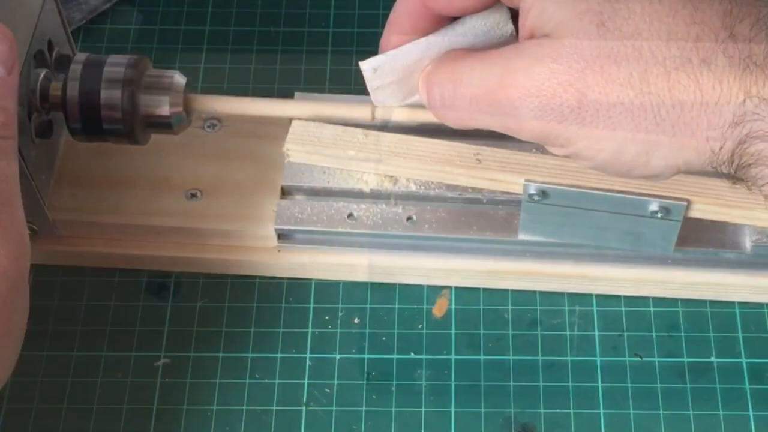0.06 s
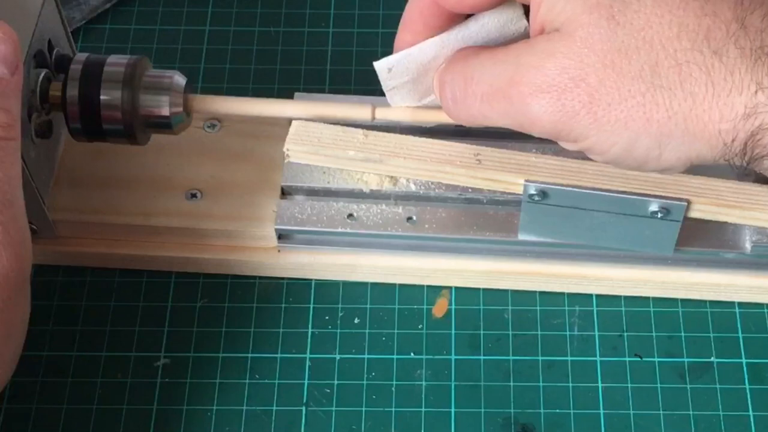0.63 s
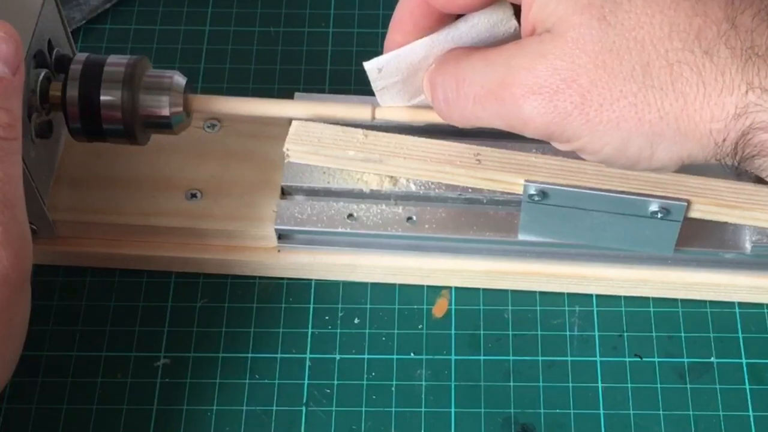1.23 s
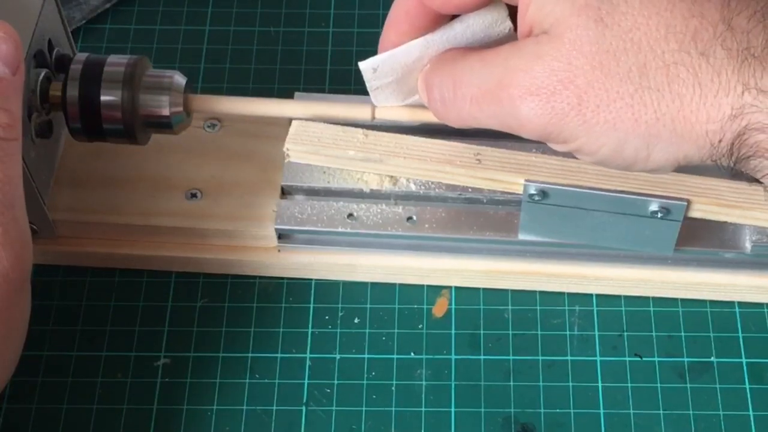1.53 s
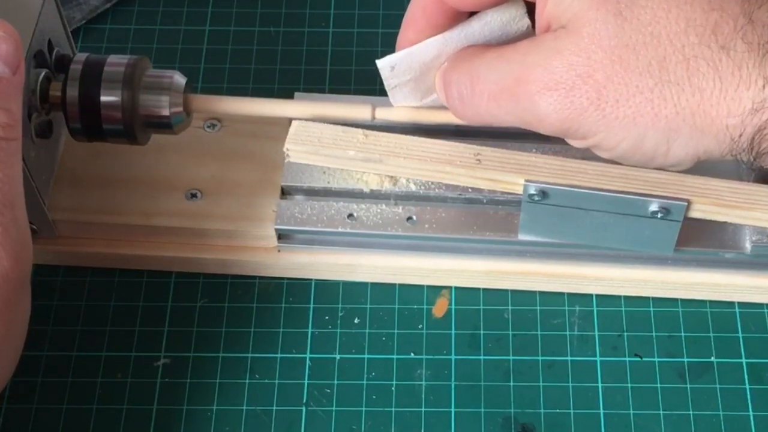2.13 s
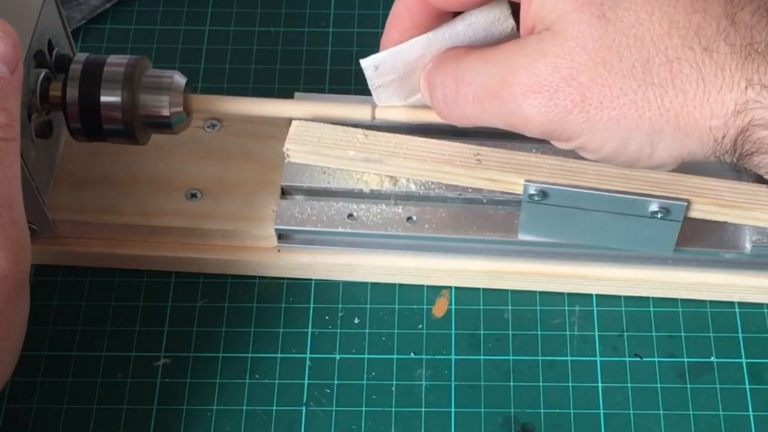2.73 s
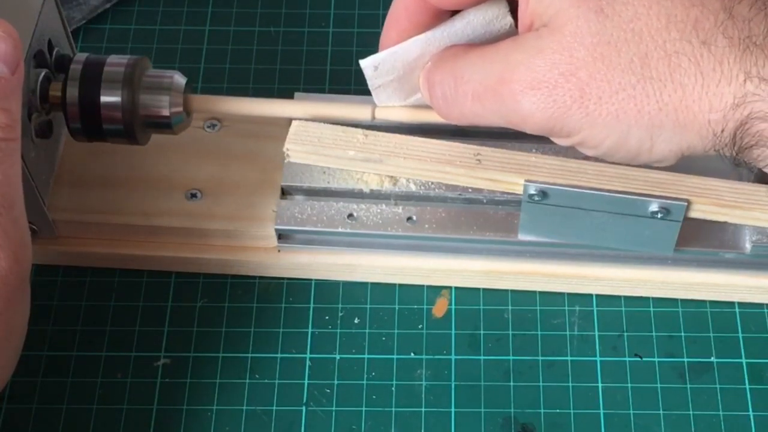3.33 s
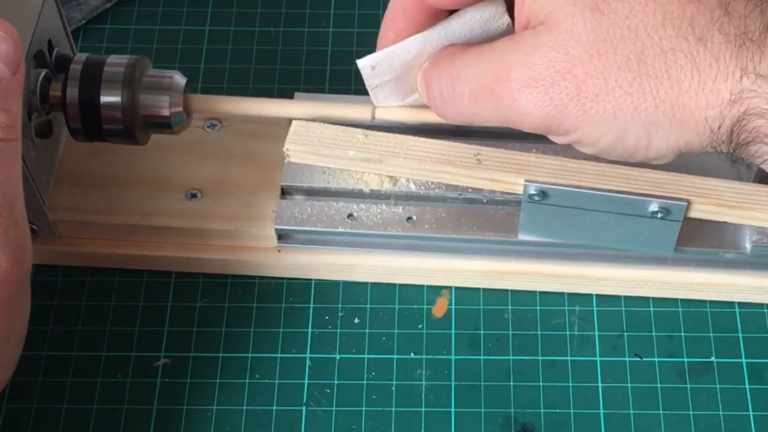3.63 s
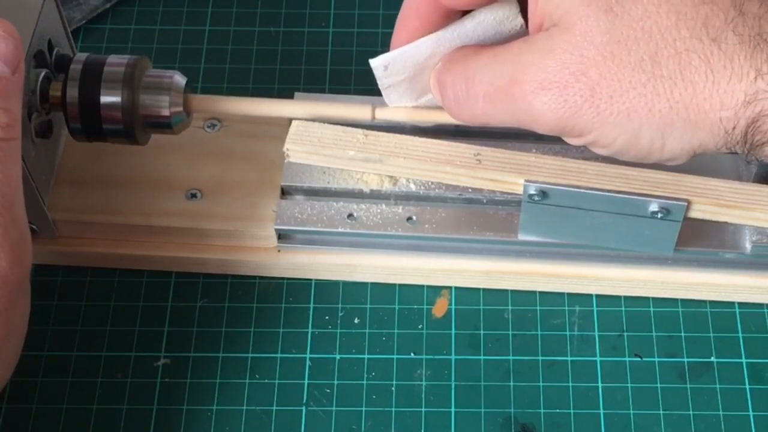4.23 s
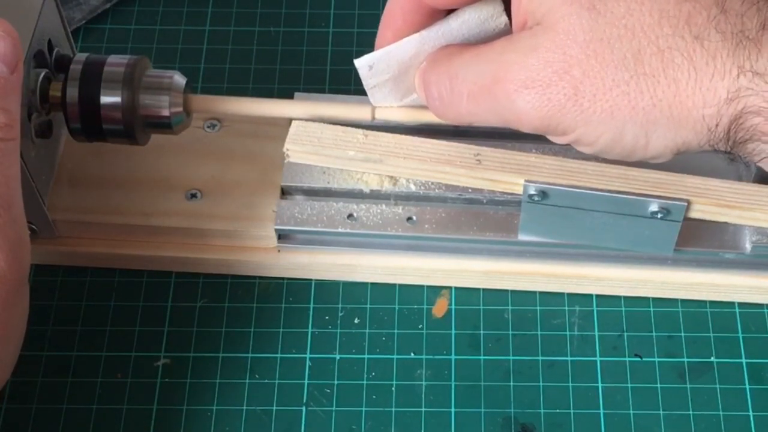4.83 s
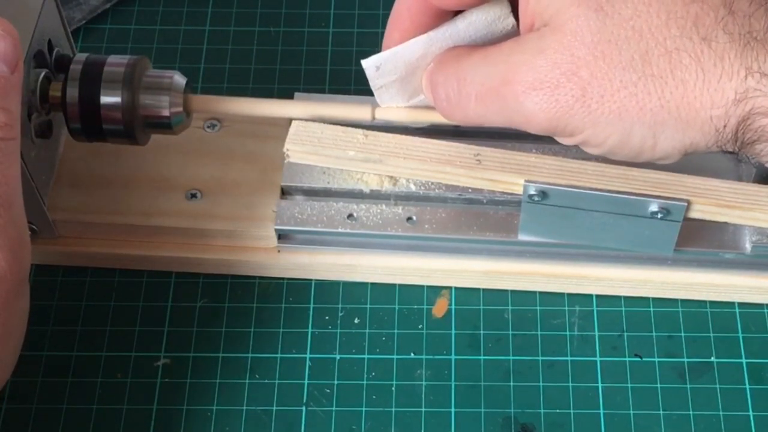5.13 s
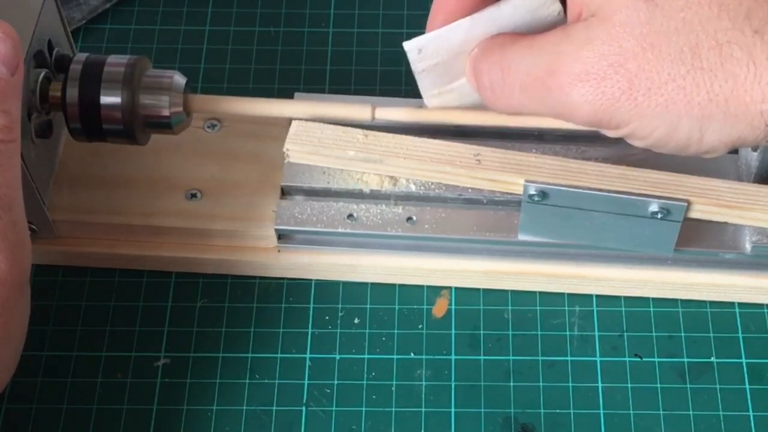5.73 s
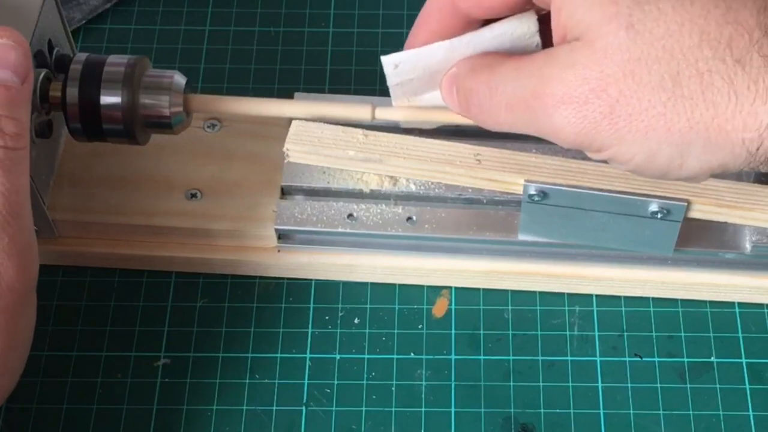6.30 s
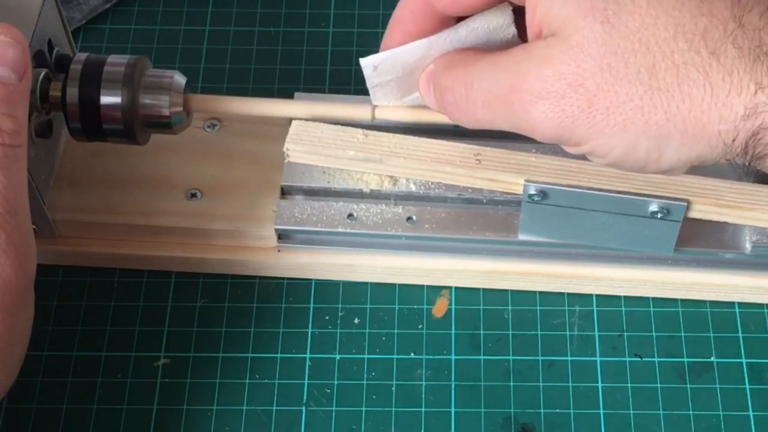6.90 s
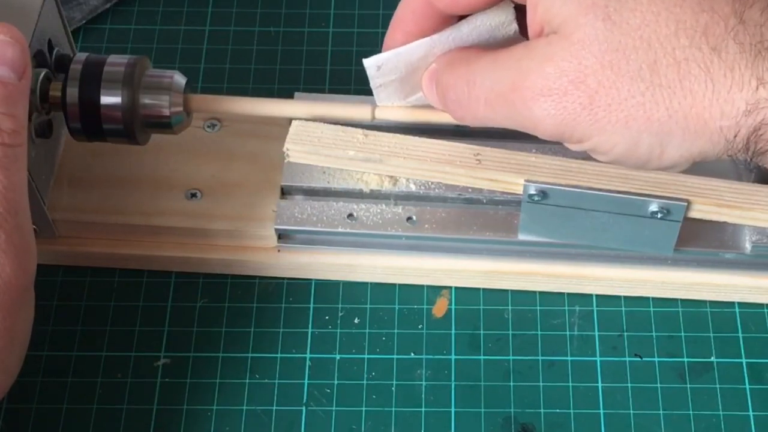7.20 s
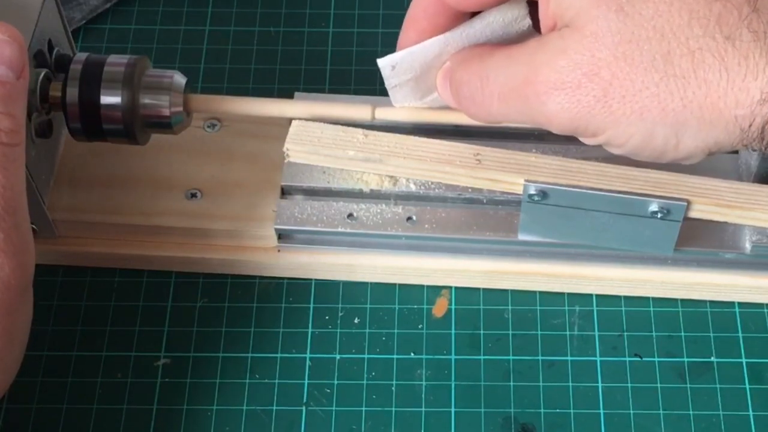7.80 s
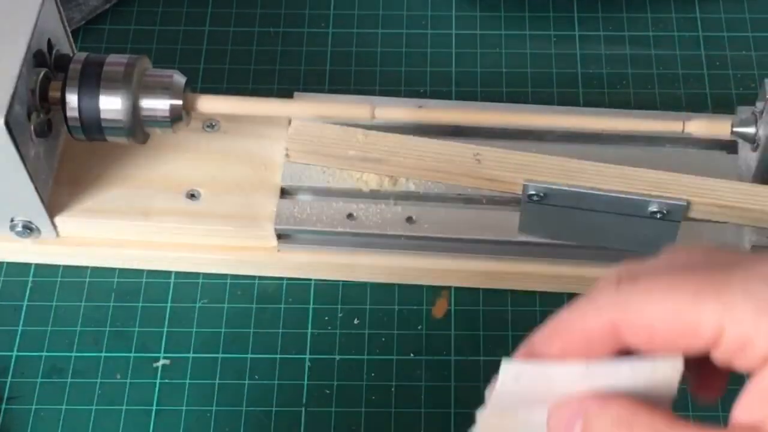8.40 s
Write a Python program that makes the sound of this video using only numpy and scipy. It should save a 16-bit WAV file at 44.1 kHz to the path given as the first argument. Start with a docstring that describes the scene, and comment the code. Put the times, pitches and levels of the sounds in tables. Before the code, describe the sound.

The hum of a small motor and the grainy hiss of sandpaper on a turning wooden rod fade in, close up in a workshop with little echo. A slack chuck chatters and knocks irregularly over a low bearing rumble and a thin whine. Later the paper comes off briefly and the motor runs a little faster with a rough whir. Sanding resumes, then the paper lifts again just before the end.

```python
"""A motor's hum and a dry rasp fade in: sandpaper held against a wooden dowel that spins in a drill chuck
at about 112 turns a second. The shaft hums, the ball bearings rumble and hiss, and the slack chuck
rattles and knocks into the metal frame in short bouts. Twice the paper is lifted: the motor speeds up
a little, the bare rod whirs and the overtones shift."""
import sys
import numpy as np
from scipy import signal
from scipy.fft import rfft, irfft, next_fast_len
from scipy.io import wavfile

SR = 44100
rng = np.random.default_rng(int(sys.argv[2]) if len(sys.argv) > 2 else 0)


def int16_out(signal):
    """Quantize to a 16-bit WAV file."""
    q = np.round(np.clip(np.atleast_2d(signal).T, -1, 1) * 32767)
    wavfile.write(sys.argv[1], SR, q.astype(np.int16))


N = 377055

# workshop room tone: (frequency [Hz], relative level [dB])
ROOM_SPECTRUM = [(15, 9.5), (40, 0), (90, 5.5), (170, -6.5), (500, -0.5), (1500, -8), (7000, -27.5)]
# reflections off the bench and nearby things: (delay [s], gain [factor])
BENCH_ECHOES = [(.00129, 0.062), (.00427, 0.054), (.00455, 0.046), (.00907, .08), (0.013, 0.069)]
# dips in what the frame radiates: (frequency [Hz], width [Hz], depth [0-1])
FRAME_DIPS = [(283, 55, 0.6), (595, 27, 0.6), (626, 48, 0.82), (762, 20, .55), (818, 36, 0.3),
              (917, 22, 0.4), (1060, 50, 0.3), (1330, 70, 0.4), (2090, 90, 0.2), (2780, 24, 0.2),
              (5916, 110, 0.9), (6000, 70, 0.6)]
# wandering hollows in the treble: (frequency [Hz], width [Hz], wander [Hz], depth [0-1])
TREBLE_HOLLOWS = [(3458, 117, 38, 0.95), (4150, 70, 50, 0.7)]
# the paper comes off the rod: (time [s], length [s])
PAPER_LIFTS = [(5.799, 0.58), (8.069, 0.6)]
# whir of the undamped rod: (frequency [Hz], relative level [dB])
WHIR_SPECTRUM = [(150, -23), (400, -11), (600, 4), (950, 1.5), (1400, -3), (2000, 4.5), (2600, -12.5),
                 (4000, -30.5)]
# modes of the wooden bed: (frequency [Hz], width [Hz], relative level [dB])
BED_MODES = [(118.3, 21, -3), (215.9, 27.3, -1), (346.5, 40, 1), (434, 38, -7.5), (676.4, 21.8, -3),
             (783.7, 45, -9.5), (882.5, 32, -13), (995, 30, -12), (1219, 26, -12.5), (1353, 22, -9.5)]
# the bed shudders and the rumble thickens or thins: (middle [s], length [s], gain [dB])
BED_SHUDDERS = [(1.1, 0.8, 0.5), (5.705, 0.55, 3), (6.5, 0.8, 3), (6.73, 0.12, 3.5), (7.7, 1.2, -1.5)]
# hiss of bearings and paper: (frequency [Hz], relative level [dB])
HISS_SPECTRUM = [(300, -9), (800, -3), (1300, -1.5), (2000, 1.5), (3000, -4.5), (3650, -0.5), (3755, 9),
                 (3880, -1.5), (4080, 1.5), (4350, 1.5), (5650, 0.5), (5950, 0.5), (6350, -3), (6750, -8.5),
                 (7100, -35)]
# the paper bites harder or lighter: (middle [s], length [s], hiss gain [dB])
PAPER_BITES = [(1.2, 2.6, -0.7), (3.45, 1.1, 0.4), (6.3, 1.3, -0.9), (7.3, 0.7, 0.8)]
# modes of chuck and frame: (frequency [Hz], width [Hz], relative level [dB])
METAL_MODES = [(1594, 150, -10), (1666, 107, -6.5), (1746, 40, -6.5), (1954, 44, -8), (2297, 78, -2.5),
               (2442, 70, -1.5), (2520, 50, 2), (2637, 110, -2.5), (2817, 134, 0.5), (2942, 132, 2.5),
               (3089, 150, -2.5), (3200, 74, -2), (3410, 110, -6)]
# bouts of rattling in the slack chuck: (middle [s], length [s], gain [dB])
RATTLE_BOUTS = [(0.287, 0.61, 4), (0.7, 0.24, 3.5), (0.812, 0.14, 6.5), (0.927, 0.18, 4), (1.175, 0.22, 4),
                (1.568, 0.26, 6), (1.853, 0.15, 3), (2.03, 0.49, 5), (2.46, 0.15, 2.5), (2.585, 0.2, 4.5),
                (2.933, 0.45, 3.5), (3.48, 0.12, 2), (3.704, 0.24, 3.5), (3.976, 0.14, 3.5),
                (4.222, 0.46, 2.5), (4.484, 0.18, 6.5), (4.71, 0.3, 4.5), (5.059, 0.72, 5),
                (5.502, 0.11, 4), (5.587, 0.14, 6.5), (6.147, 0.59, 3.5), (6.417, 0.076, 7.5),
                (6.65, 0.16, 2.5), (7.385, 0.85, 4), (7.773, 0.12, 0), (7.93, 0.41, 6), (8.177, 0.24, 3),
                (8.43, 0.15, 1.5)]
# harder knocks that stand out of the rattle: (time [s], relative level [dB])
CHUCK_KNOCKS = [(0.671, -25), (0.806, -19), (1.233, -24), (1.744, -21), (1.974, -21), (2.388, -18),
                (2.555, -20), (2.627, -16), (2.765, -18), (3.072, -19.5), (3.4123, -14), (3.481, -23),
                (3.703, -22), (3.7624, -20), (4.2051, -21), (4.478, -25), (4.687, -12.5), (4.7218, -17.5),
                (4.776, -18), (5.08, -18), (5.29, -18), (5.334, -25), (5.596, -14.5), (5.8996, -21),
                (6.0146, -15.5), (6.166, -22), (6.225, -17.5), (6.65, -21), (6.7682, -19.5), (6.887, -24),
                (7.069, -19), (7.115, -20), (7.1863, -16), (7.3752, -19), (7.465, -15), (7.52, -14.5),
                (7.5903, -19), (7.7492, -18), (7.8557, -15), (7.928, -16)]
# growl and whine of the bearings: (pitch [x shaft speed], relative level [dB], gain when free [dB])
BALL_TONES = [(1.925, -51, -3), (3.075, -45.3, -2.2), (4.075, -60, 1), (6.075, -58, 0), (21.7, -55, 1),
              (22.7, -57, 0), (23.6, -55, -2), (25.6, -55, -1), (28.54, -52, -5)]
# spells in which the whirling rod runs true: (middle [s], length [s], fall [units of whirl])
TRUE_RUNS = [(0.9, 1.3, 0.98), (2.392, 0.95, 1.73), (4.155, 0.82, 1.65), (5.56, 0.73, 1.4)]
# single overtones swell or sink: (pitch [x shaft speed], middle [s], length [s], gain [dB])
HARMONIC_SWELLS = [(6, 0.33, 1.2, -6), (6, 7.83, 0.63, 4.5), (7, 0.63, 0.5, 5), (7, 2.11, 0.4, 5.5),
                   (7, 7.2, 1.2, 5.5), (10, 0.55, 0.87, 6), (10, 5, 1.2, 9), (10, 7.0, 0.83, -7),
                   (6, 8.4, 0.6, 1), (11, 8.4, 0.5, 2), (11, 5.9, 0.5, -7), (11, 0.39, 0.97, -4),
                   (10, 2.62, 0.7, -6), (10, 4.45, 0.3, -4), (6, 2.7, 0.63, 3)]
# shaft hum: (pitch [x shaft speed], level [dB], gain when free [dB], gain per unit of whirl [dB])
SHAFT_HARMONICS = [(1, -27.5, 0.7, 0.13), (2, -45, 1, 10), (4, -65.5, 7.5, -4), (5, -48, 0, -0.3),
                   (6, -48, 5.5, -3.5), (7, -53, -1, 0), (10, -51.5, -8.5, 1), (11, -53, 1.5, -2),
                   (12, -70, 13.5, 2.5), (13, -59.5, 0, -4.5), (14, -67.5, 0, 1.5), (15, -53, 2, 0),
                   (17, -63.5, -4, 1), (20, -52, 3, -2.5), (21, -59, -1, -3.5)]
# opening fade: (time [s], gain [factor])
FADE_CURVE = [(0, 0.28), (0.3, 0.57), (0.68, 0.96)]

BALLS, BALL_PASSES_PER_TURN = 8, 3.075


def from_db(db):
    """Decibels to gain."""
    return 10 ** (np.asarray(db) / 20)


def rms_one(x):
    """Scale to an rms of one."""
    return x / np.sqrt(np.mean(x ** 2) + 1e-20)


def delayed(x, delay_s):
    """The same sound, later."""
    return np.interp(np.arange(N) - delay_s * SR, np.arange(N), x, left=0)


def swells(rows):
    """A curve of smooth bumps, one for each (middle [s], length [s], height)."""
    t = np.arange(N) / SR
    return sum(height * np.cos(np.pi * np.clip((t - middle_s) / length_s, -.5, .5)) ** 2
               for middle_s, length_s, height in rows)


def drift(rate_hz):
    """Smooth random motion with a spread of one."""
    step, run_in = 40, 2000
    pole = np.exp(-2 * np.pi * rate_hz * step / SR)
    noise = rng.standard_normal(N // step + run_in + 2)
    slow = signal.lfilter([1], [1, -2 * pole, pole * pole], noise)[run_in:]
    return np.interp(np.arange(N) / step, np.arange(len(slow)), rms_one(slow))


def pulse(turns, per_turn=1):
    """A cosine locked to the shaft's turning."""
    return np.cos(2 * np.pi * per_turn * turns)


def coloured(x, spectrum):
    """Give a noise its spectrum; rms one."""
    hz, level_db = np.transpose(spectrum)
    size = next_fast_len(N)
    bins_hz = np.maximum(np.fft.rfftfreq(size, 1 / SR), 1)
    gain = from_db(np.interp(np.log(bins_hz), np.log(hz), level_db))
    return rms_one(irfft(rfft(x, size) * gain, size)[:N])


def resonate(x, hz, width_hz):
    """One resonance, gain one at its top."""
    r = np.exp(-np.pi * width_hz / SR)
    feedback = [1, -(1 + r * r) * np.cos(2 * np.pi * hz / SR), r * r]
    return signal.lfilter(np.array([1, 0, -1]) * (1 - r * r) / 2, feedback, x + 1e-18)


def tone(turns, multiple):
    """A tone locked to the shaft, rms one; small wobbles unsettle the high tones most."""
    waver, flutter = min(.025 * (multiple - .6), .4), min(.009 * multiple, .35)
    surge, slip = [waver * drift(rate_hz=8.3) + flutter * drift(rate_hz=9.3) for _ in range(2)]
    phase = 2 * np.pi * multiple * turns
    return rms_one(slip * np.sin(phase) - (1 + surge) * np.cos(phase))


def room_tone(level_db=-52):
    """The workshop's steady, dark background."""
    return from_db(level_db) * coloured(rng.standard_normal(N), ROOM_SPECTRUM)


def bench_echoes(x):
    """Faint early reflections off the bench and nearby things."""
    return sum(gain * delayed(x, delay_s) for delay_s, gain in BENCH_ECHOES)


def frame_dips(x):
    """The frame radiates poorly in a few narrow bands."""
    for hz, width_hz, depth in FRAME_DIPS:
        x = x - depth * resonate(x, hz, width_hz)
    return x


def treble_hollows(x):
    """Narrow notches wander to and fro in the treble."""
    for hz, width_hz, wander_hz, depth in TREBLE_HOLLOWS:
        centre_hz = hz + wander_hz * drift(rate_hz=3.2)
        carrier = np.exp(2j * np.pi * np.cumsum(centre_hz) / SR)
        lowpass = signal.butter(2, width_hz / 2, fs=SR, output="sos")
        band = signal.sosfiltfilt(lowpass, x / carrier, padtype=None)
        x = x - depth * 2 * (band * carrier).real
    return x


def free_running(spin_up_s=0.0945, settle_s=0.243):
    """0 under the paper, 1 running free: the motor spins up quickly and settles back slowly."""
    t = np.arange(N) / SR
    free = np.zeros(N)
    for lift_s, length_s in PAPER_LIFTS:
        rise = 1 - np.exp(-np.maximum(t - lift_s, 0) / spin_up_s)
        free += rise * np.exp(-np.maximum(t - lift_s - length_s, 0) / settle_s)
    return free


def shaft_speed(free, loaded_hz=112.12, free_hz=112.95, wander_hz=.1):
    """Turns per second: faster when free, sagging under a last press of the paper before each lift."""
    lead_s, press_s, sag_hz = 0.027, 0.2406, 0.664
    sag = swells((lift_s - lead_s, press_s, sag_hz) for lift_s, _ in PAPER_LIFTS)
    return loaded_hz + (free_hz - loaded_hz) * free - sag + wander_hz * drift(rate_hz=2.037)


def whine(turns, free, level_db=-51, free_db=2.5, flicker_db=1.5):
    """A thin, flickering high whine, stronger with the paper off."""
    flickering = tone(turns, multiple=33.49) * from_db(flicker_db * drift(rate_hz=5.6))
    return from_db(level_db + free_db * free) * rms_one(flickering)


def rod_whir(turns, free, level_db=-44.5, push_db=3):
    """With the paper off, the bare rod adds a rough whir, pulsing once a turn."""
    noise = rng.standard_normal(N) * from_db(push_db * pulse(turns))
    return from_db(level_db) * free * coloured(noise, WHIR_SPECTRUM)


def rumble_level(free, loaded_db=-42.5, free_db=2.5):
    """In dB: the paper damps the bearings, so they rumble more when it is off; the bed also shudders."""
    return loaded_db + free_db * free + swells(BED_SHUDDERS) + 0.15 * drift(rate_hz=3.8)


def bearing_rumble(turns, level_db, push_db=3):
    """Balls rolling on uneven races shake the wooden bed, hardest at each turn's push."""
    force = rng.standard_normal(N) * from_db(push_db * pulse(turns))
    bed = sum(from_db(db) * resonate(resonate(force, hz, width), hz, width)
              for hz, width, db in BED_MODES)
    return from_db(level_db) * rms_one(bed)


def come_round(x, turns, repeat=0.24, wear=0.89):
    """Rough spots come round for six more turns, fainter as they wear: a trace of pitch in the rasp."""
    turn_s = 1 / (np.gradient(turns) * SR)
    return x + repeat * sum(wear ** k * delayed(x, (k + 1) * turn_s) for k in range(6))


def friction_hiss(turns, rattle_db, level_db=-37.5, grain_db=1.35):
    """Grainy hiss of the bearings and of grit on wood; it swells with the rattle and the paper's bite."""
    grit = come_round(rng.standard_normal(N), turns)
    texture = from_db(grain_db * drift(rate_hz=300) + 0.16 * pulse(turns))
    swell_db = swells(PAPER_BITES) + 0.3 * (rattle_db - rattle_db.mean())
    return from_db(level_db + swell_db) * coloured(grit * texture, HISS_SPECTRUM)


def metal_ring(x, contact_hz=3900):
    """The modes of chuck and frame, summed with alternating signs; blunt contacts carry little treble."""
    force = signal.sosfilt(signal.butter(4, contact_hz, fs=SR, output="sos"), x + 1e-18)
    return sum((-1) ** k * from_db(db) * resonate(force, hz, width)
               for k, (hz, width, db) in enumerate(METAL_MODES))


def rattle_level(resting_db=-37, unrest_db=0.5):
    """In dB: a quiet, restless rattle that swells in each bout."""
    return resting_db + swells(RATTLE_BOUTS) + unrest_db * drift(rate_hz=9.1)


def chuck_rattle(turns, level_db, impacts_per_s=5000, spread_db=3):
    """Dense little impacts, in clumps and hardest where the contact force peaks, ring the metal."""
    impacts = (rng.random(N) < impacts_per_s / SR) * rng.choice([-1, 1], N)
    sizes = from_db(spread_db * rng.standard_normal(N))
    # the contact force peaks twice a turn and each time a ball rolls by
    contact_db = 3 * pulse(turns, 2) + 3 * pulse(turns, BALL_PASSES_PER_TURN)
    # the ball cage and the crooked rod each lean on the bearing once per turn of their own
    lean_db = 0.5 * pulse(turns, BALL_PASSES_PER_TURN / BALLS) + 0.8 * pulse(turns)
    clump_db = 1.4 * drift(rate_hz=55)
    force = come_round(impacts * sizes, turns) * from_db(contact_db + lean_db + clump_db)
    return from_db(level_db) * rms_one(metal_ring(force))


def chuck_knocks(chatter_s=0.018, lag_s=0.002, gain_db=-5):
    """The chuck takes up its slack with a knock, inside a short burst of chatter."""
    clicks = np.zeros(N)
    for time_s, db in CHUCK_KNOCKS:
        clicks[round(time_s * SR)] += from_db(db)
    bursts = signal.fftconvolve(clicks, np.hanning(round(chatter_s * SR)), "same")
    chatter = delayed(bursts, lag_s) * rng.standard_normal(N)
    unit_peak = np.abs(metal_ring(signal.unit_impulse(SR // 10))).max()
    return from_db(gain_db) * metal_ring(0.85 * clicks + 0.071 * chatter) / unit_peak


def bearing_growl(turns, free, rumble_db):
    """The rolling balls add tones off the shaft's harmonics that swell with the rumble."""
    balls = sum(from_db(db + free_db * free) * tone(turns, multiple)
                for multiple, db, free_db in BALL_TONES)
    return balls * from_db(0.9 + 0.5 * (rumble_db - rumble_db.mean()))


def shaft_hum(turns, free, usual_whirl=0.27):
    """One push a turn makes harmonics; their balance shifts with the load and the rod's off-axis whirl."""
    whirl = usual_whirl - swells(TRUE_RUNS)
    hum = np.zeros(N)
    for multiple, db, free_db, whirl_db in SHAFT_HARMONICS:
        swell_db = swells(bump for which, *bump in HARMONIC_SWELLS if which == multiple)
        hum += from_db(db + free_db * free + whirl_db * whirl + swell_db) * tone(turns, multiple)
    return hum


def scene():
    """The turning shaft drives hum, rasp and rumble; the knocks and the room tone join them."""
    free = free_running()
    speed_hz, rattle_db, rumble_db = shaft_speed(free), rattle_level(), rumble_level(free)
    turns = np.cumsum(speed_hz) / SR + rng.random()
    rasp = chuck_rattle(turns, rattle_db) + friction_hiss(turns, rattle_db)
    machine = rasp + bearing_rumble(turns, rumble_db) + rod_whir(turns, free) + chuck_knocks()
    noise = treble_hollows(frame_dips(machine + bench_echoes(machine) + room_tone()))
    tones = shaft_hum(turns, free) + bearing_growl(turns, free, rumble_db) + whine(turns, free)
    return (tones + noise)[None]


def record(dry, cutoff_hz=6950):
    """A short fade-in and a steep cut of the top end."""
    fade = np.interp(np.arange(N) / SR, *np.transpose(FADE_CURVE))
    return signal.sosfilt(signal.ellip(12, .1, 90, cutoff_hz, fs=SR, output="sos"), dry * fade)


dry = scene()
out = record(dry)
int16_out(out)
```